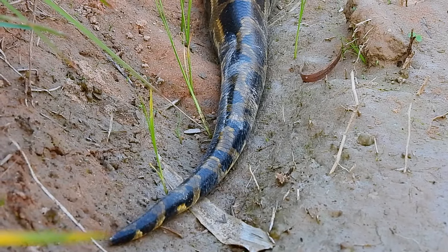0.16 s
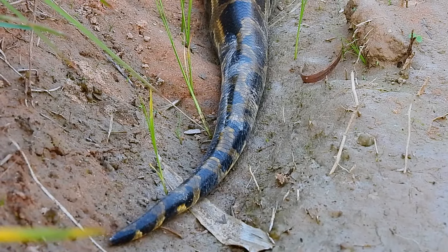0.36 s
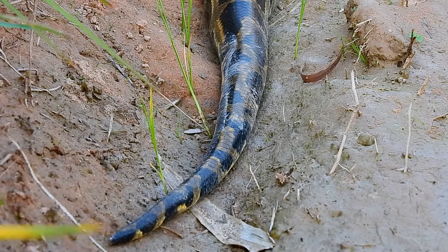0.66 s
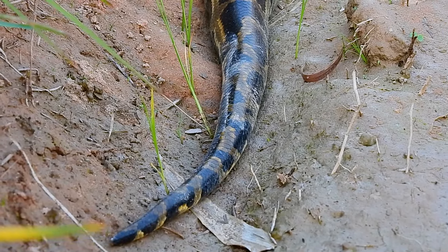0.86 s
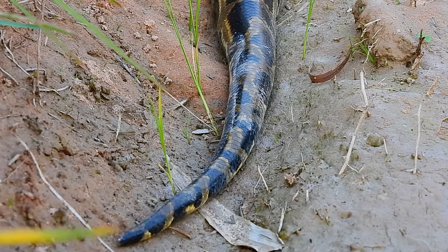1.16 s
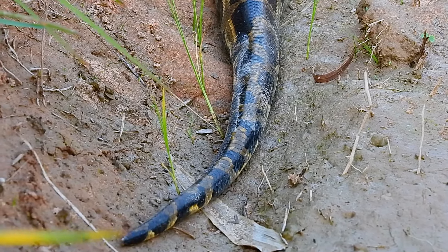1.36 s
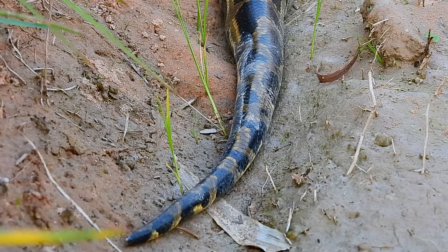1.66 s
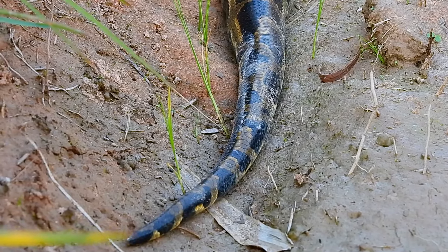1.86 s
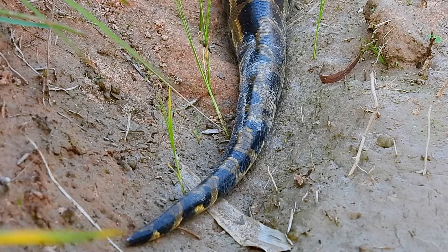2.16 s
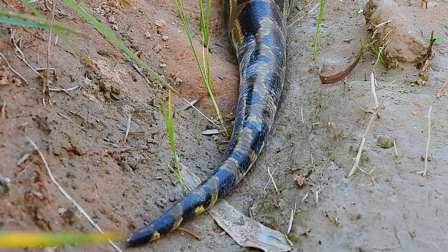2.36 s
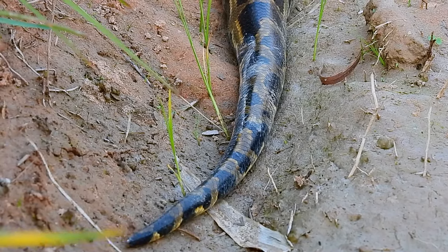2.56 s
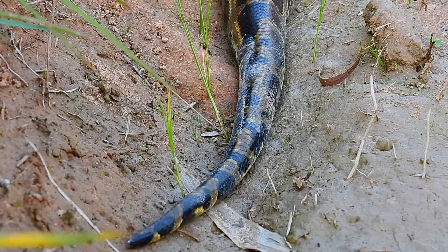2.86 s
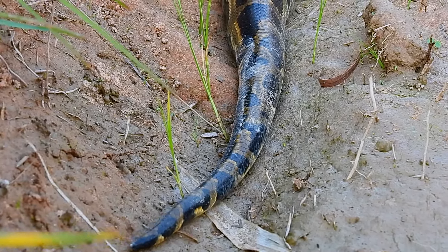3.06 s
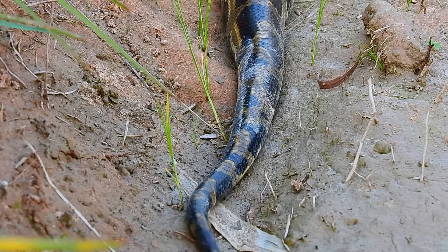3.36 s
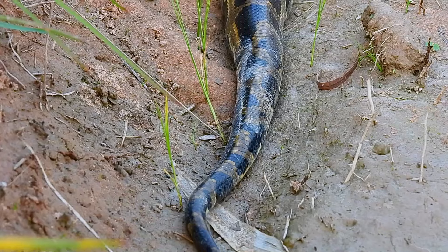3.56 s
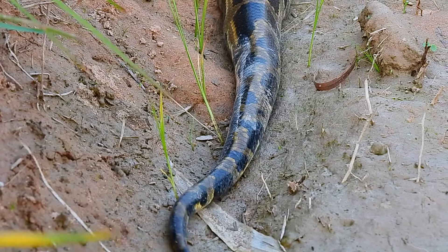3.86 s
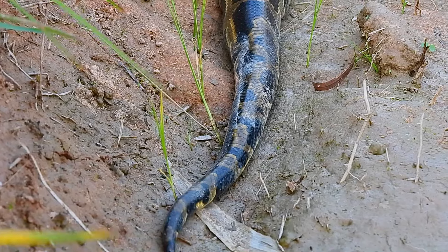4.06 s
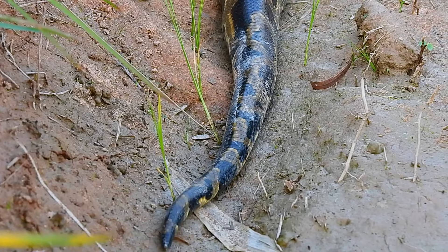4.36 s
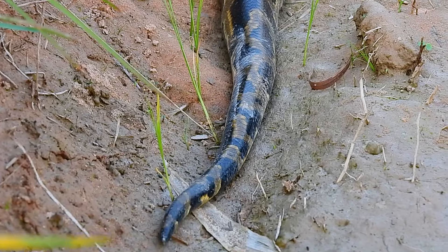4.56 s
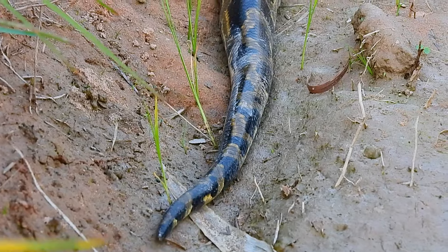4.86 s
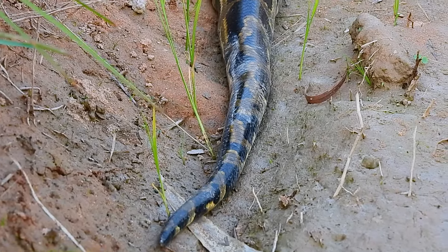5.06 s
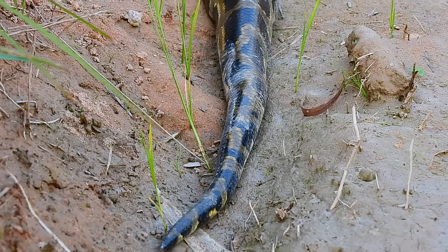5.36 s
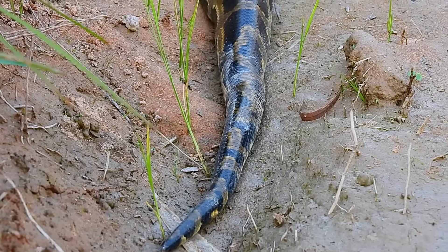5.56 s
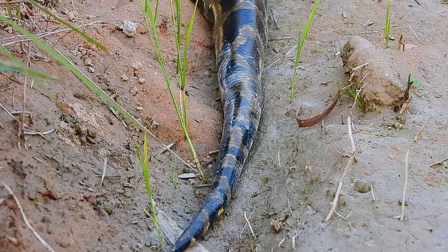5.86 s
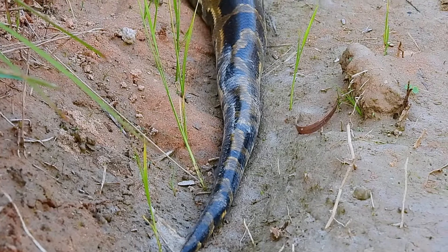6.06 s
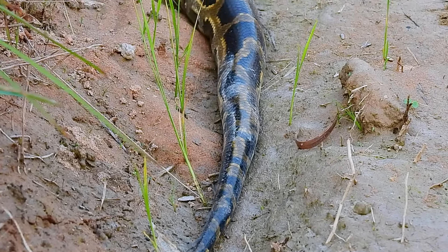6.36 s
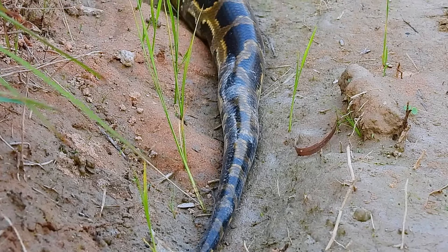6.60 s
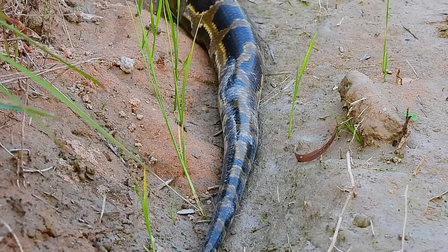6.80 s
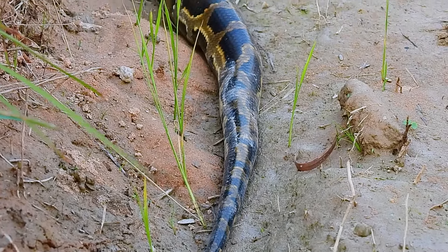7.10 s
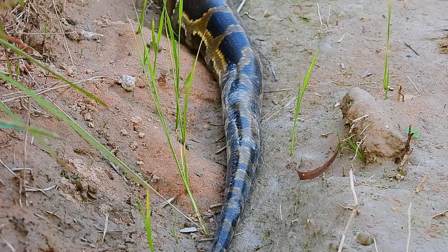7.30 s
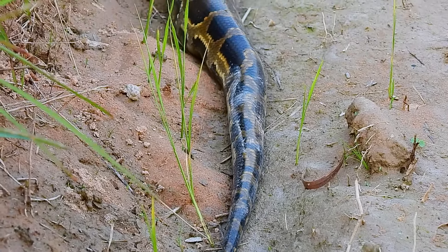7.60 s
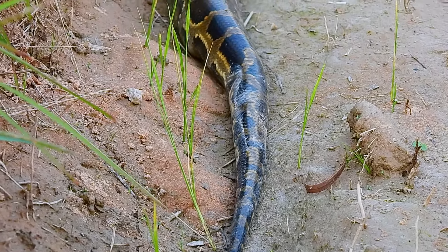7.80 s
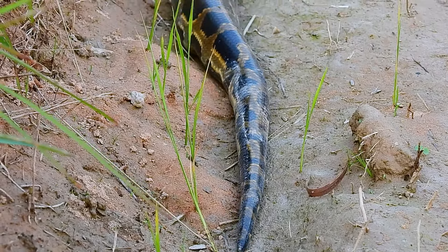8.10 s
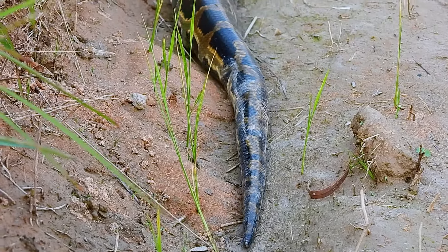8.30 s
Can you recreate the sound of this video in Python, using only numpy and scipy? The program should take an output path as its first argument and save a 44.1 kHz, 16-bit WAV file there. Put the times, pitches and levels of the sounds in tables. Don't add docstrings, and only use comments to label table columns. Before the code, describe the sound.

A heavy snake drags in fits over soil and dry leaves, scraping and crackling, with sharp twig snaps and distant bird whistles.

```python
import sys
import numpy as np
from scipy import signal
from scipy.fft import rfft, irfft, next_fast_len
from scipy.io import wavfile

SR = 44100
rng = np.random.default_rng(int(sys.argv[2]) if len(sys.argv) > 2 else 0)


def pcm_store(signal):
    levels = np.round(np.clip(np.atleast_2d(signal), -1, 1) * 32767)
    wavfile.write(sys.argv[1], SR, levels.astype(np.int16).T)


def volts(x):
    e = np.asarray(x, float) / 20
    return 10 ** e


N = 372204


def rms_one(x):
    return x / np.sqrt(np.mean(x ** 2) + 1e-20)


def in_time(rows):
    s, *columns = np.transpose(rows)
    return [np.interp(np.arange(N) / SR, s, c) for c in columns]


def at_hz(points, hz, column=1):
    return np.interp(np.log(hz), np.log(np.array(points)[:, 0]), np.array(points)[:, column])


def drift(rate_hz):
    r = np.exp(-64 * np.pi * rate_hz / SR)
    noise = rng.standard_normal(N // 32 + 1002)
    slow = signal.lfilter([1], [1, -2 * r, r * r], noise)[1000:]
    return np.interp(np.arange(N) / 32, np.arange(len(slow)), rms_one(slow))


def resonate(x, hz, width_hz):
    r = np.exp(-np.pi * width_hz / SR)
    zeros = np.array([1, 0, -1]) * (1 - r * r) / 2
    return signal.lfilter(zeros, [1, -2 * r * np.cos(2 * np.pi * hz / SR), r * r], x)


def band(x, low_hz, high_hz):
    return signal.sosfilt(signal.butter(2, [low_hz, high_hz], "band", fs=SR, output="sos"), x)


def grains(per_s, spread_db):
    shape = (2, 2, N)
    sizes = volts(spread_db * np.minimum(rng.exponential(1, shape), 4)) * rng.standard_normal(shape)
    return rms_one(sizes * (rng.random(shape) < per_s / SR) + 1e-9)


def spread(mid, side, alike):
    alike = np.clip(alike, 0, 1)
    return np.sqrt(1 + alike) * mid + np.sqrt(1 - alike) * side * [[1], [-1]]


# hz, near_sources [0-1], far_air [0-1]
LIKENESS = [(60, 1, 0.1), (250, 0.4, 0.67), (724, 0.86, 0.7), (2500, 0.8, 0.74), (4900, 0.92, 0.2),
            (11700, 0.04, 0)]


def coloured(source, spectrum, patchy_db, column, flicker_hz=25):
    octaves = np.log2(spectrum[-1][0] / spectrum[0][0])
    edges = spectrum[0][0] * 2 ** np.arange(0, octaves + .01, .4)
    out = 0
    for k, (low, high) in enumerate(zip(edges, edges[1:])):
        hz = np.sqrt(low * high)
        mid, side = band(source[k % 2], low, high)
        gain = volts(at_hz(spectrum, hz) + patchy_db * drift(flicker_hz))
        out = out + gain * spread(mid, side, at_hz(LIKENESS, hz, column))
    return rms_one(out)


# hz, density_db_per_hz
AIR = [(29, -80), (50, -120), (183, -13), (423, -7), (513, -7.5), (622, -6), (1030, -8.5), (1130, 4),
       (1250, -10), (1660, -10), (3260, -8.5), (4560, -24), (7370, -29.5), (12800, -40.5), (15500, -45)]


def air():
    return volts(-57.5) * coloured(rng.standard_normal((2, 2, N)), AIR, patchy_db=2.5, column=2)


def cricket():
    t = np.arange(N) / SR
    every_s, until_s, level_db = .059, .7, -69
    pulses = np.cos(np.pi * t / every_s) ** 4 * (t < until_s)
    return volts(level_db) * pulses * rms_one(resonate(rng.standard_normal(N), 7700, 350))


def tone(rows, wobble_hz):
    hz, db = in_time(rows)
    t = np.arange(N) / SR
    sounding = (t > rows[0][0]) & (t < rows[-1][0])
    phase = 2 * np.pi * np.cumsum(hz + wobble_hz * drift(155)) / SR
    return sounding * np.sqrt(2) * volts(db) * np.sin(phase)


# start_s, pitch_hz, level_db
WHINE = [
    [(7.08, 9680, -72), (7.15, 9650, -65), (7.27, 9650, -67), (7.3, 9640, -78), (7.42, 9660, -74),
     (7.48, 9640, -63), (7.6, 9680, -69), (7.66, 9650, -66), (7.8, 9700, -75)],
    [(7.26, 9880, -75), (7.3, 9900, -68), (7.4, 9880, -74)],
    [(7.27, 9400, -73), (7.31, 9260, -68), (7.36, 9300, -70), (7.43, 9420, -74)],
    [(7.57, 9900, -73), (7.63, 9930, -67), (7.74, 9880, -73)],
]


def insect():
    whine = sum(tone(rows, wobble_hz=35) * volts(5 * drift(50) - 1.5) for rows in WHINE)
    return whine * np.ones((2, 1))


# start_s, pitch_hz, level_db
WHISTLES = [
    [(1.208, 6000, -66), (1.219, 7050, -57), (1.245, 6650, -58), (1.275, 6300, -48), (1.292, 6180, -49),
     (1.305, 6250, -70)],
    [(1.788, 6380, -62), (1.798, 6230, -48), (1.815, 6060, -58), (1.833, 6290, -48), (1.846, 6130, -57),
     (1.9, 6080, -61), (1.95, 6090, -70)],
    [(2.292, 6600, -66), (2.302, 7050, -51), (2.35, 6150, -45), (2.375, 5600, -58), (2.41, 5300, -54),
     (2.432, 5650, -59), (2.447, 6150, -48), (2.46, 7050, -53), (2.475, 7000, -68)],
    [(5.13, 4950, -78), (5.16, 5250, -74), (5.21, 5900, -74), (5.225, 6000, -80)],
]


def bird():
    call = sum(tone(rows, wobble_hz=30.8) for rows in WHISTLES)
    decay_60db_s, echo_db = .62, -1
    t = np.arange(int(.7 * SR)) / SR
    echo = rng.standard_normal((2, len(t))) * volts(-60 * t / decay_60db_s) * (t > .008)
    echo /= np.sqrt(np.sum(echo ** 2, axis=1, keepdims=True))
    direct = np.array([np.roll(call, -3), call])
    return direct + volts(echo_db) * signal.fftconvolve(call[None], echo, axes=1)[:, :N]


# start_s, end_s, pitch_hz,
# width_hz, level_db
BLADES = [(0.41, 1.263, 2640, 1470, -58.5), (7.48, 7.85, 4500, 1400, -62.5),
          (0.701, 0.742, 6550, 3000, -48.5), (2.12, 2.264, 2340, 570, -44.5),
          (2.53, 2.541, 1050, 800, -23.5), (2.55, 2.773, 2220, 430, -52), (3.09, 3.3, 1970, 250, -61),
          (4, 4.242, 606, 201, -51.5), (4.392, 4.85, 616, 260, -64), (4.033, 4.035, 347, 150, -44),
          (4.278, 4.304, 426, 120, -50), (4.301, 4.32, 450, 150, -50), (4.355, 4.388, 680, 129, -40),
          (4.453, 4.477, 654, 150, -51.5), (4.508, 4.534, 635, 150, -50.5), (4.569, 4.596, 615, 150, -50),
          (4.613, 4.642, 686, 150, -54), (4.652, 4.678, 630, 150, -54), (4.67, 4.716, 550, 180, -51),
          (4.762, 4.782, 620, 150, -45), (4.785, 4.819, 795, 200, -48), (4.824, 4.84, 637, 150, -51.5),
          (2.97, 3.001, 1160, 300, -51.5), (8.236, 8.285, 2500, 900, -49),
          (5.897, 5.948, 3440, 1220, -42.5), (5.901, 5.937, 1200, 490, -41), (5.926, 6.068, 3350, 300, -52),
          (6.16, 6.357, 3260, 900, -53.5), (6.354, 6.432, 3140, 960, -54.5),
          (6.635, 6.718, 870, 560, -36.5), (6.718, 6.917, 3280, 150, -42.5), (6.733, 6.917, 3790, 250, -46),
          (6.947, 6.991, 4200, 500, -35.5), (6.98, 7.014, 3720, 700, -38), (7.006, 7.016, 3660, 900, -33),
          (6.882, 6.985, 1060, 350, -43), (6.994, 7.024, 623, 403, -29.5), (4.794, 5.014, 3320, 500, -62),
          (7.149, 7.316, 1230, 630, -55), (8.03, 8.163, 4700, 900, -64)]


def blades():
    out, t = np.zeros((2, N)), np.arange(N) / SR
    throb, rub = volts(1.8 * drift(27)), rng.standard_normal((2, N))
    for start, end, hz, width_hz, level_db in BLADES:
        span = slice(int(start * SR), int(end * SR))
        mid, side = rms_one(resonate(resonate(rub[:, span], hz, width_hz), hz, 1.5 * width_hz))
        fade_s = min(.035, (end - start) / 4)
        swell = np.clip(np.minimum(t[span] - start, end - t[span]) / fade_s, 0, 1)
        out[:, span] += volts(level_db) * swell * throb[span] * spread(mid, side, at_hz(LIKENESS, hz))
    return out


# start_s, peak_db, ring_hz, splintering_db
CLODS = [(4.014, -29, 595, 6), (4.11, -27, 738, -3), (4.122, -23, 720, -4), (4.166, -25, 825, 6),
         (4.244, -37, 418, 6), (2.536, -35.5, 455, -6), (4.339, -29, 655, -12), (4.622, -47, 690, -3),
         (4.715, -27, 640, 8), (5.103, -42.5, 610, 21.5), (6.69, -48, 664, -1), (6.951, -13.5, 428, -9),
         (7.052, -24, 520, -6), (7.096, -31.5, 706, 10), (7.508, -19, 910, 11.5), (7.517, -32, 810, 17),
         (7.687, -36.5, 805, 18.5), (8.034, -38, 920, -7)]
TWIGS = [(1.683, -36, 1760, 8), (2.143, -27, 2720, -8), (2.532, 2, 2350, -7.5), (2.537, -25, 2190, 17),
         (2.56, -27, 2280, 13.5), (2.578, -16, 2400, 2), (2.696, -19, 2180, -2), (2.729, -21, 2020, -6),
         (3.118, -36, 2010, 0), (3.157, -32.5, 2100, -10), (4.479, -34, 1160, 17.5), (4.989, -34, 2090, 15),
         (5.887, -34, 2520, 13), (8.169, -31, 2410, -10), (8.235, -31, 2550, 15.5)]
STEMS = [(.383, -21, 1525, -2.5), (.4, -31, 2070, -1), (2.344, -33, 3330, -15), (5.907, -41, 3500, 19),
         (5.971, -25.5, 3230, -8), (6.188, -31, 3120, -17), (6.831, -25, 3200, 2), (6.889, -19, 3350, -6),
         (7.303, -37.5, 3150, 3.5), (7.503, -28, 5300, -8), (7.508, -23.5, 5500, 5.5),
         (8.278, -34, 4870, 5.5)]
# start_s, peak_db, ring_hz, splintering_db
TICKS = [(2.566, -23, 2800, 1), (2.655, -32, 2220, 1), (2.68, -35, 2240, -6), (2.902, -34, 3130, -0.5),
         (4.038, -32.5, 890, 13.5), (4.05, -30, 3430, 5), (4.063, -26, 1890, 5), (4.077, -35, 910, -4),
         (4.095, -40, 1710, 0), (4.11, -22, 810, -2), (4.116, -31, 850, 3), (4.123, -27.5, 910, 10.5),
         (4.141, -27, 1430, 12), (4.15, -31, 1520, 0), (4.159, -30, 875, 5), (4.167, -31, 870, 0),
         (4.182, -28.5, 855, 10), (4.246, -36, 5300, 7), (4.281, -36, 596, -7), (4.339, -27, 810, 3),
         (4.364, -35.5, 3200, 19), (4.436, -31.5, 3300, -7), (4.518, -31, 700, 3), (4.538, -36, 1200, 1),
         (4.772, -37, 686, 0), (4.791, -36, 910, 13), (4.829, -27, 650, 5), (4.968, -33, 1290, 6),
         (5.13, -38, 900, 15), (6.229, -26, 3130, -12), (6.763, -19, 3270, -14), (6.843, -15, 3240, -11),
         (6.863, -28, 3130, -6), (6.872, -21, 3730, 0), (6.951, -11, 2000, -4), (6.981, -16, 3700, -11),
         (7.0, -20, 3320, -5), (7.007, -20, 3400, -8), (7.012, -23, 3400, -8), (7.04, -19, 2200, -4),
         (7.045, -19, 810, 11), (7.051, -23, 890, -3), (7.068, -31, 1020, 10), (7.096, -24.5, 1520, -2),
         (7.507, -18, 1973, -3), (7.507, -22, 12500, -12), (7.983, -48, 3000, 14), (8.086, -30, 2520, -7),
         (8.131, -27.5, 1300, -6), (8.218, -30.5, 2250, 2.5)]
# thud_db, body_db, crack_db
CLOD_VOICE, TWIG_VOICE, STEM_VOICE = (-13.5, -8, -19), (-17.5, -10.5, -31), (-32, 0.88, -13)
TICK_VOICE = (-7.5, -7, -21.5)


def snaps():
    size = 3000
    out = np.zeros((2, N + size))
    t = np.arange(size) / SR
    tear_s, tick_s, edge_db, ragged_share = .003, .00073, -17, .35
    kinds = [(CLODS, CLOD_VOICE, tear_s), (TWIGS, TWIG_VOICE, tear_s),
             (STEMS, STEM_VOICE, tear_s), (TICKS, TICK_VOICE, tick_s)]
    rows, part_s = [], []
    for table, voice, seconds in kinds:
        for s, db, hz, splintering_db in table:
            rows.append((s, db, hz, *np.add(voice, splintering_db)))
            part_s.append(seconds)
    part_s = np.array(part_s)[:, None, None]
    tearing = volts(-6 * (t / part_s) ** 2) + .04 * volts(-60 * t / .08)
    bursts = rng.standard_normal((len(rows), 2, size)) * np.minimum(t / .0005, 1) * tearing
    edges_hz = (250, 1200), (1200, 4000), (4000, 8000), (8000, 15000)
    bands = [band(bursts, *edges) for edges in edges_hz]
    for row, shape, burst, *parts in zip(rows, tearing, bursts, *bands):
        s, db, hz, thud_db, body_db, crack_db = row
        width_hz = 120 + .1 * hz
        swing = 2 * shape * np.sin(2 * np.pi * hz * t) * np.sqrt(width_hz / SR)
        ringing = resonate(resonate(ragged_share * burst + swing, hz, width_hz), hz, .5 * hz)
        ring, thud, body, crack, edge = [p / np.abs(p[0]).max() for p in (ringing, *parts)]
        treble = crack + volts(edge_db) * edge
        mid, side = ring + volts(thud_db + 3) * thud + volts(body_db + 2) * body + volts(crack_db + 2) * treble
        at = int((s - .0011) * SR)
        out[:, at:at + size] += volts(db - 10.5) * spread(mid, side, 1.0)
    return out[:, :N]


def stroke(t, start, length, attack_s, sag_db, release_db_per_s):
    u = t - start
    loss_db = sag_db * np.clip(u / length, 0, 1) + release_db_per_s * np.maximum(u - length, 0)
    return (np.clip(u / attack_s, 0, 1) * volts(-loss_db)) ** 2


# start_s, length_s, effort_db, weight_on_soil_db, leaf_cover_db
SLIDES = [(0.08, 0.89, -53, -5, -3), (0.583, 0.68, -50.5, -7, -3.5), (1.266, 0.098, -53.5, -10, -0.5),
          (1.445, 0.067, -52.5, -8, -1), (1.598, 0.042, -61, -6, 1.5), (1.668, 0.22, -55, -27, 4.5),
          (1.887, 0.14, -54, -16, -1), (2.061, .15, -43.5, -15, -3), (2.211, 0.29, -48, -15.5, -1.5),
          (3.374, 0.57, -56.5, -11, -3), (4.99, 0.14, -57, 6.5, -2.5), (5.253, 0.87, -83, 13, 13.5),
          (6.139, 0.17, -47, 1, -5.5), (6.512, 0.21, -41.5, 4, -0.5), (6.728, 0.053, -39, -17, -2.5),
          (6.79, 0.23, -46.5, 4.5, 13), (7.072, 0.18, -53.5, -5.5, 0), (7.32, 0.26, -74, 7, 16),
          (7.82, 0.12, -77.5, 11, 21), (8.251, 0.2, -58, -12, 4)]
SHOVES = [(1.671, 0.039, -51, -3, 2.5), (2.52, 0.21, -37.5, -18, -2.5), (2.772, 0.28, -49, -9, -2),
          (3.107, 0.32, -56, -4, 2.5), (4.006, 0.21, -51, 7.5, 3), (4.25, .34, -56.5, 12, 8),
          (4.63, 0.13, -57.5, 7.5, -4), (4.745, 0.1, -51, 0, -3.5), (4.848, .13, -54, 4, -7),
          (5.177, 0.055, -72.5, 19.5, 5), (5.882, 0.15, -44.5, 1.5, -6), (6.362, 0.083, -56, 6, -5),
          (6.943, 0.022, -34.5, 10, -7), (6.994, 0.016, -35, 7, 9), (7.037, 0.012, -30, -2.5, -13),
          (7.086, 0.027, -36.5, -6.5, -5.5), (7.485, 0.32, -59, 2, 0), (8.02, 0.12, -44, -10, -13.5),
          (8.224, 0.064, -50.5, -2, -2)]
JERKS = [(2.048, 0.092, -55, -18, 7), (2.367, .025, -44, -18, -16), (2.417, 0.013, -49, -16, -1),
         (2.438, 0.015, -39, -18, -6), (2.79, 0.022, -51, -13, 3), (2.813, 0.022, -49, 4.5, -2),
         (2.846, 0.015, -44, -2.5, -3), (2.892, 0.032, -49, -8, 2.5), (2.94, 0.043, -50, -10, 3.5),
         (3.028, .01, -42.5, -7, -1.5), (3.047, 0.013, -49, 0, -2), (3.064, 0.044, -55.5, -4, 1.5),
         (3.115, 0.016, -49.5, -4, 0), (3.16, .01, -56, -6, 6), (3.199, 0.027, -54, -8, 7.5),
         (3.279, 0.017, -47, -11, -5), (3.308, 0.03, -57.5, -8, 11), (4.108, 0.012, -44, 7, -7),
         (4.141, 0.0091, -49, -2, 5), (4.161, 0.035, -51.5, 13.5, 0), (4.348, 0.014, -52.5, 7, 7),
         (4.467, 0.019, -46, -4, -5), (4.5, 0.069, -47, -3, -3), (4.771, 0.022, -42, -5, -8),
         (4.978, 0.007, -40, -11, 3.5), (6.633, 0.046, -46, -1, 7.5), (6.75, 0.024, -38, -5, -1.5),
         (6.834, 0.037, -38.5, -11, -5), (6.885, 0.015, -38, 3.5, 2), (6.995, 0.0074, -35.5, -6, 10.5),
         (7.583, .015, -59, 1, 11), (8.062, .012, -48.5, -11, -2), (8.087, .016, -53, -6, -7),
         (8.11, 0.015, -45, -2, -13), (8.134, 0.01, -46, -4, -12), (8.162, 0.016, -43.5, -10.5, -4),
         (8.316, 0.039, -50, -13, -1)]
# start_s, length_s, level_db
CRUMPLES = [(0.684, 0.069, -44.5), (1.138, 0.1, -54.5), (1.31, 0.12, -56.5), (1.499, 0.019, -48),
            (2.418, 0.071, -47), (2.819, 0.021, -43.5), (3.323, 0.024, -54), (3.38, 0.027, -58),
            (4.683, 0.02, -51.5), (4.96, 0.011, -61), (5.09, 0.018, -58), (5.19, 0.021, -61),
            (7.0, 0.3, -54), (7.496, 0.35, -55), (8.178, 0.016, -54), (8.212, 0.051, -54)]


def pressure():
    t = np.arange(0, N / SR + .002, .001)
    rest_db, crackle_under_leaf_db, pressed_flat = -96, -9.5, .1
    power = np.full((4, len(t)), volts(2 * rest_db))
    moves = [(row, stroke(t, *row[:2], .56 * row[1], 0, 228)) for row in SLIDES]
    for table, attack_s in ((SHOVES, .013), (JERKS, .0099)):
        for row in table:
            release_db_per_s = 500 * np.sqrt(.055 / row[1])
            moves.append((row, stroke(t, *row[:2], attack_s, 3, release_db_per_s)))
    for (_, _, effort_db, weight_db, cover_db), shape in moves:
        crackle_db = cover_db + crackle_under_leaf_db - pressed_flat * weight_db
        power += volts(effort_db + np.array([[weight_db], [0], [cover_db], [crackle_db]])) ** 2 * shape
    for start, length, db in CRUMPLES:
        power[3] += volts(db) ** 2 * stroke(t, start, length, .0053, 6.5, 320)
    return in_time(np.column_stack([t, *(10 * np.log10(power))]))


def chips(levels_db, per_s, cycles):
    hits = volts(6.5 * np.minimum(rng.exponential(1, N), 3)) * (rng.random(N) < per_s / SR)
    pitches_hz, dealt = np.geomspace(350, 9000, 16), rng.integers(0, 16, N)
    material = np.searchsorted([1000, 2600, 5500], pitches_hz)
    out = 0
    for k, (hz, m) in enumerate(zip(pitches_hz, material)):
        ringing = resonate(hits * (dealt == k) + 1e-12, hz, 5.3 * hz / cycles)
        out = out + volts(levels_db[m]) * rms_one(ringing)
    return out


# hz, density_db_per_hz
SOIL = [(60, -15), (130, -46), (220, 4), (450, 0), (750, 1.5), (1100, -3.5), (1800, -7), (3000, -76)]
STALK = [(400, -7), (800, -3.5), (1200, -4), (1700, 1.5), (2300, -3), (2900, 4.5), (5000, -41)]
LEAF = [(1500, -35), (2400, 8), (3200, -5.5), (4000, 4), (5000, -4.5), (6500, -5.5), (8500, -1),
        (11000, -34)]
CRACKLE = [(3000, -7), (5000, 2), (7000, 11), (9500, 3.5), (12000, 8.5), (15000, -26)]


def crawl():
    soil_db, stalk_db, leaf_db, crackle_db = levels_db = pressure()
    load = np.clip((soil_db + 64) / 14, .35, 1)
    slip, contacts = load * drift(19), grains(7000, spread_db=3.0)
    swapped = contacts[::-1]
    soil = coloured(contacts, SOIL, patchy_db=3.0, column=1)
    soil = soil * volts(soil_db + 1.5 * slip + 1.7 * drift(32))
    stalk = coloured(swapped, STALK, patchy_db=-2.5, column=1)
    stalk = stalk * volts(stalk_db + 1.5 * slip + 2.5 * drift(28))
    leaf = coloured(contacts, LEAF, patchy_db=2.5, column=1, flicker_hz=18)
    leaf = leaf * volts(leaf_db + 1.9 * slip + 0.87 * drift(66))
    crackle = coloured(swapped, CRACKLE, patchy_db=2.0, column=1, flicker_hz=18)
    crackle = crackle * volts(crackle_db + 1.2 * slip + 2.0 * drift(60))
    broken = volts(-19) * chips(levels_db, per_s=350, cycles=22)
    return volts(-3.0) * (soil + stalk + leaf + crackle) + broken


# start_s, left_minus_right_db
BEARING = [(0.0, -0.5), (0.82, -3.5), (1.43, -1.5), (2.56, -3.5), (3.45, -2.5), (6.65, -2.5), (7.21, -2.5),
           (7.45, -2.5), (8.44, -1.5)]


def scene():
    pan_db = in_time(BEARING)[0] + 2.02
    near = (crawl() + blades() + snaps()) * volts(np.array([pan_db, -pan_db]) / 2)
    return air() + cricket() + insect() + bird() + near


def band_limit(x):
    return signal.sosfilt(signal.butter(12, 15680, fs=SR, output="sos"), x)


# hz, left_minus_right_db
PORT_BALANCE = [(60, 0), (180, 0), (550, 0.5), (1650, -1.5), (4970, -0.5), (15000, -5.5)]
# hz, lag_us [microseconds]
PORT_LAG = [(500, 60), (3500, 43.5), (6500, 55.4), (10000, 86.5), (15000, 157)]
# hz, gain_db
MIC = [(40, -9), (100, -5.5), (150, -0.5), (220, -0.5), (2700, -2.5), (3300, 1), (3750, 1), (3950, -3.5),
       (4300, 0.5), (5200, 6.5), (6200, 5), (6700, 4), (11000, -3.5), (15500, -6.5)]


def record(dry):
    size = next_fast_len(N + 4096)
    hz = np.arange(size // 2 + 1) * SR / size + 1
    lag = np.exp(-1j * np.pi * hz * at_hz(PORT_LAG, hz) / 10 ** 6)
    tilt = volts(at_hz(PORT_BALANCE, hz) / 2) * lag
    response = volts(at_hz(MIC, hz)) * np.array([tilt, 1 / tilt])
    ports = irfft(rfft(dry, size) * response, size)[:, :N]
    return band_limit(ports)


dry = scene()
out = record(dry)
pcm_store(out)
```